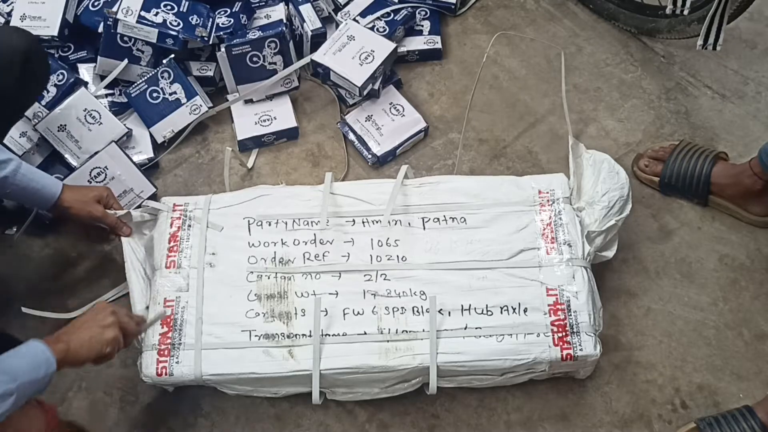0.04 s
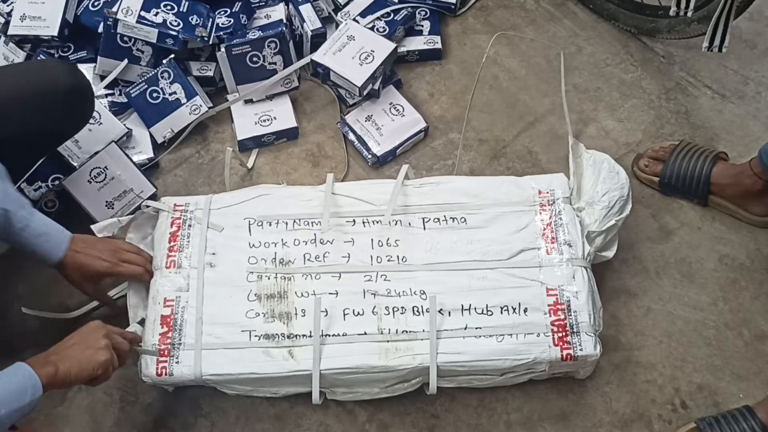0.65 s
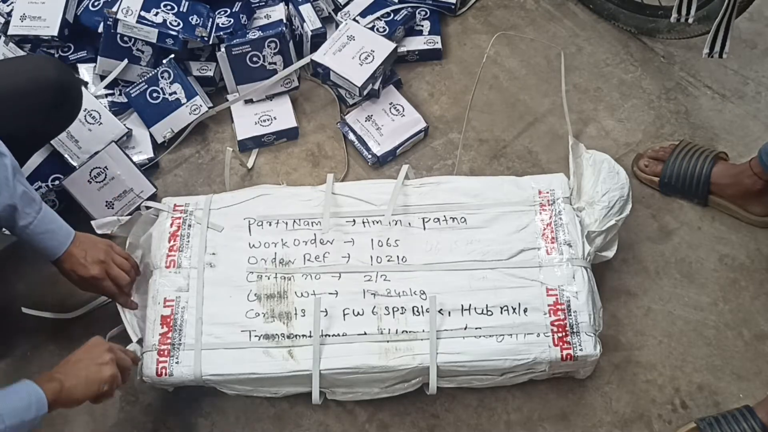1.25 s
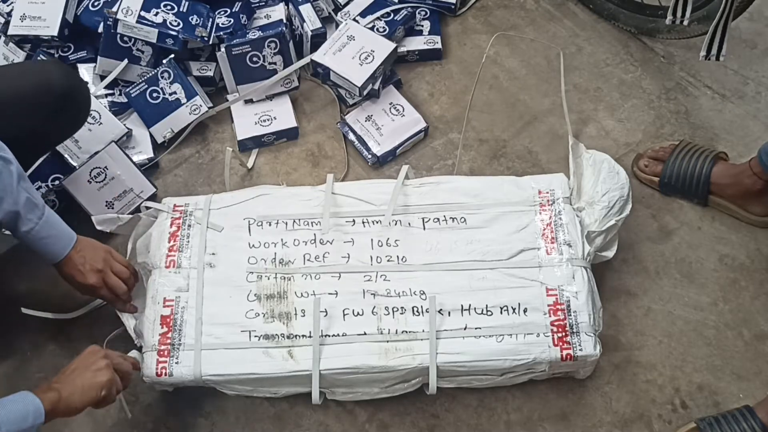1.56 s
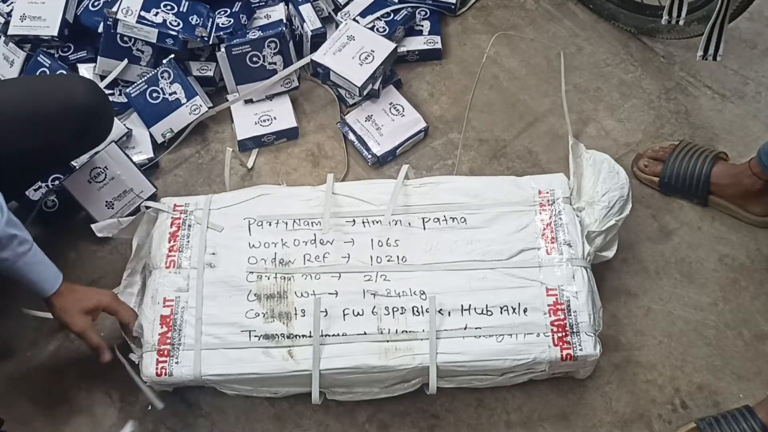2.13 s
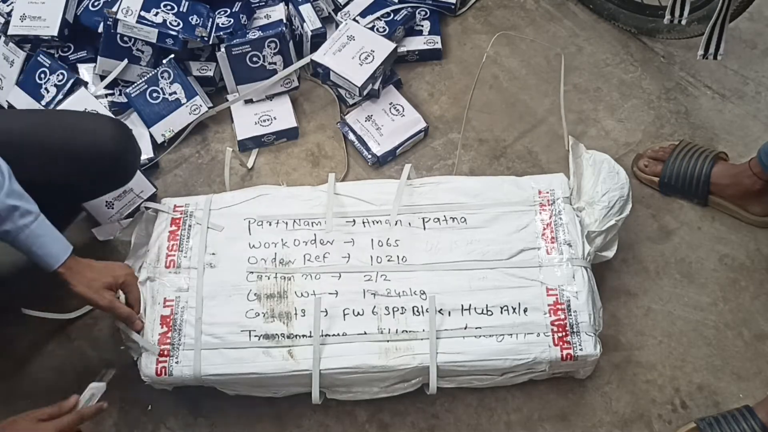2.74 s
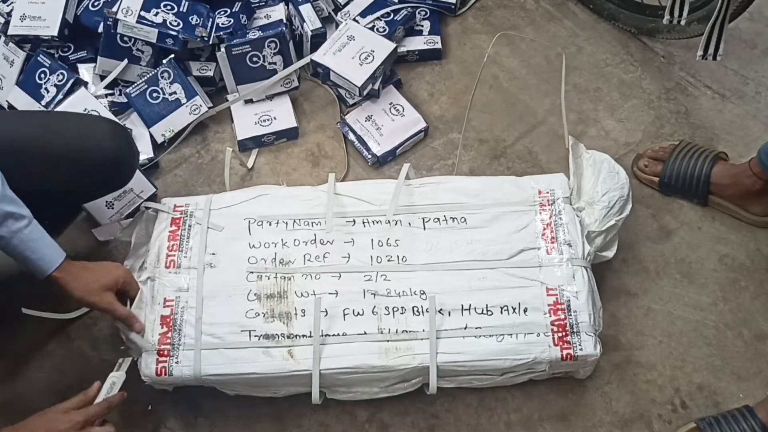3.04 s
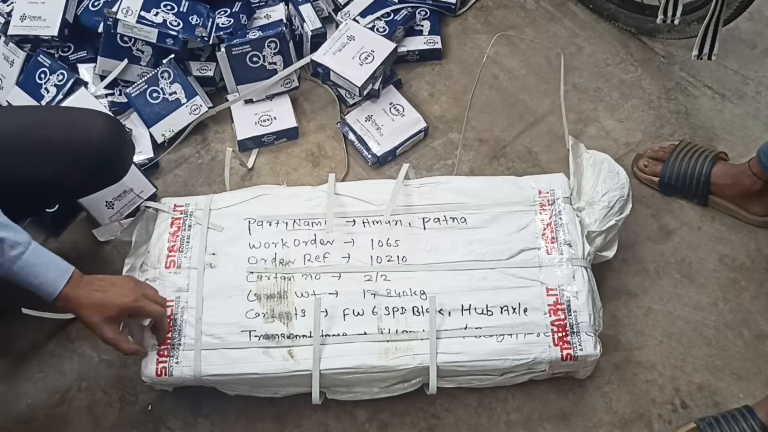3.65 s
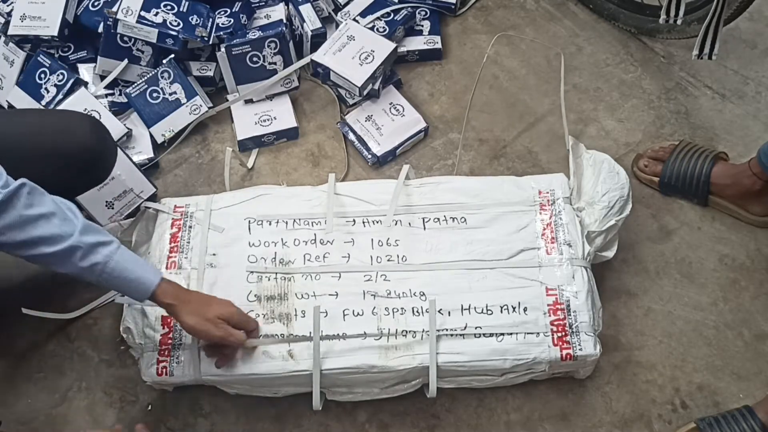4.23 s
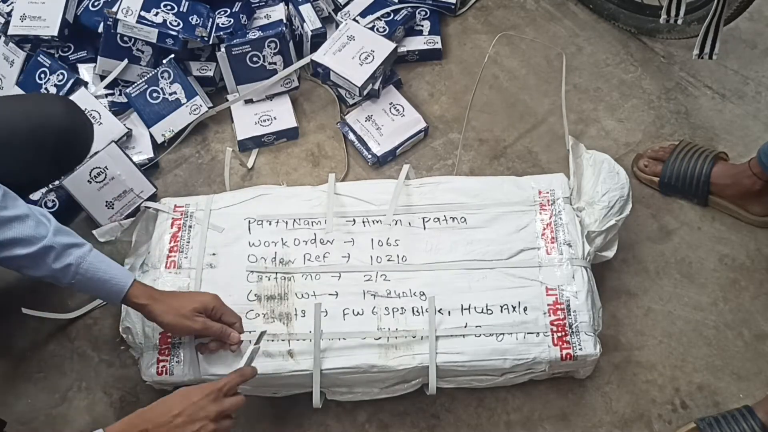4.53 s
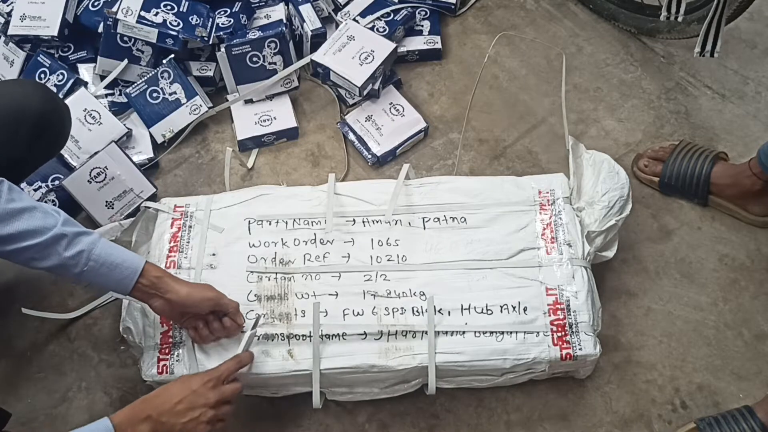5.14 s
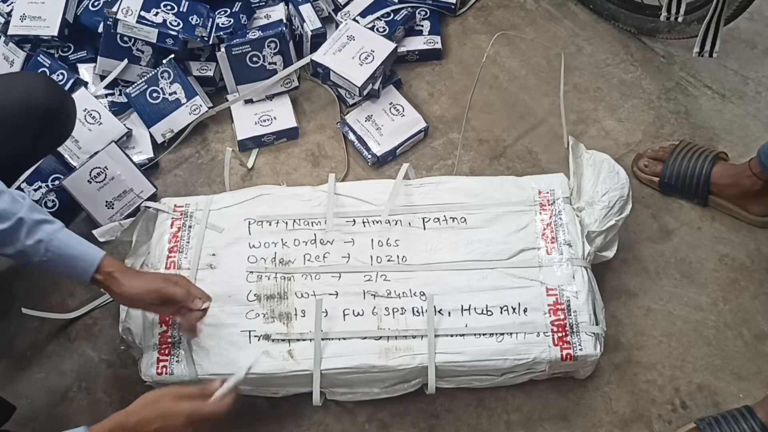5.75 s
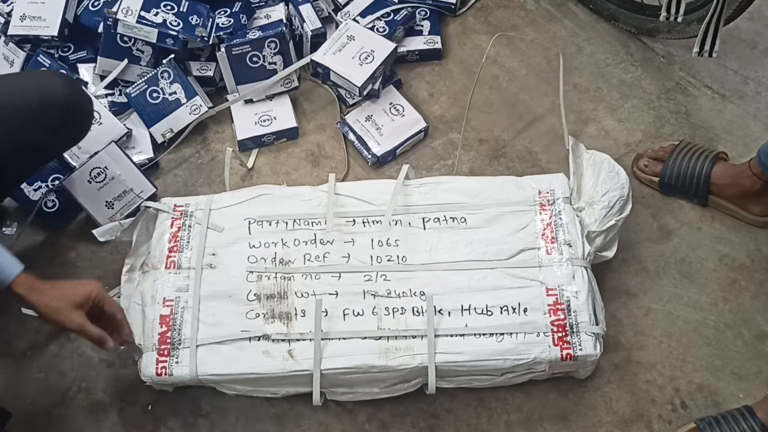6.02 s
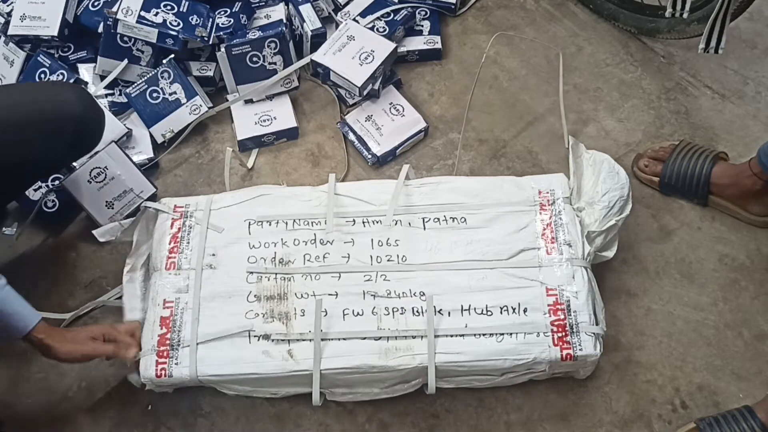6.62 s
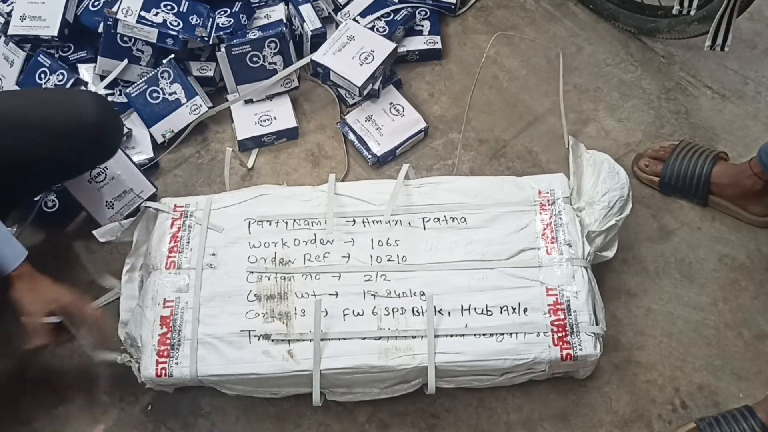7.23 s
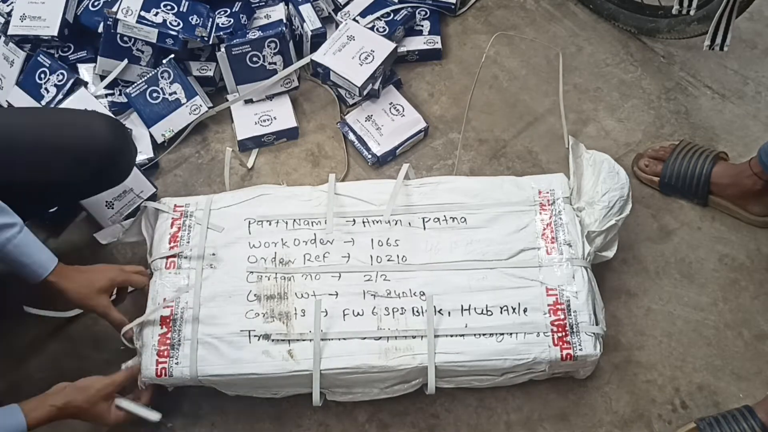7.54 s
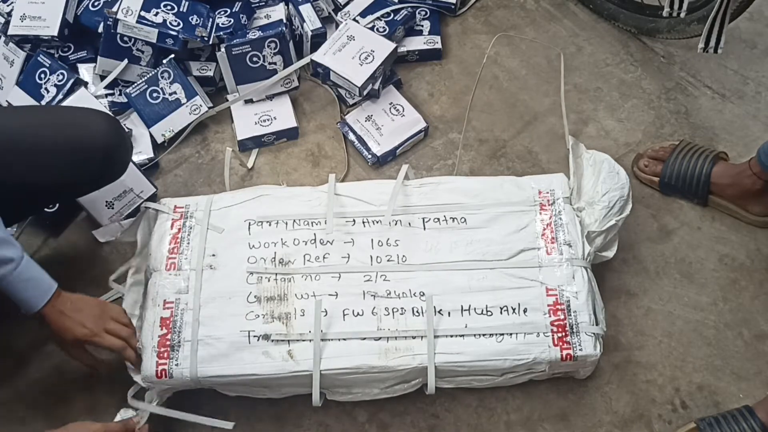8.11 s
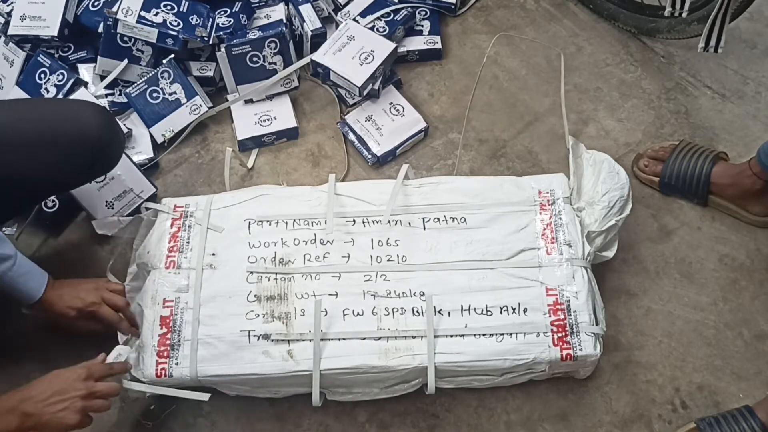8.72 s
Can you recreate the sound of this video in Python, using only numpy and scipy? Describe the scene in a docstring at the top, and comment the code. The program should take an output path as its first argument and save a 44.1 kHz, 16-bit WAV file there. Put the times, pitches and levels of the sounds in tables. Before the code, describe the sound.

Close up in a bare, quiet room, a woven plastic sack rustles and rasps unevenly while its packing straps are cut and pulled. Bright snaps bunch together in the first few seconds, then give way to light scraping and small blade ticks. One loud crack lands with a dull boom from the wrapped carton, and another thump comes a second later. The crinkling picks up again and several sharp cracks finish it.

```python
"""Cutting the straps off a carton

Plastic straps are cut and pulled off a carton sewn into a woven sack, on the floor of a bare room.
The weave crinkles under hands and straps, the knife ticks, and tight plastic cracks as it is cut.
The carton thumps when a strap lets go or a hand lands on it. One microphone listens close by."""
import sys
import numpy as np
from scipy import signal
from scipy.fft import rfft, irfft
from scipy.io import wavfile

SR = 44100
rng = np.random.default_rng(int(sys.argv[2]) if len(sys.argv) > 2 else 0)


def digitize_waveform(pressure):
    """Quantize a signal to 16-bit integers and store it at the path in sys.argv[1].

    Rows of a 2-D input are taken as channels; values are limited to [-1, 1].
    """
    field = np.atleast_2d(pressure).T
    bounded = np.clip(field, -1, 1)
    quanta = np.round(bounded * 32767).astype(np.int16)
    wavfile.write(sys.argv[1], SR, quanta)


N = 395566
TIME = np.arange(N) / SR

# Strokes of a hand or strap over the sack; rasp and carton levels are relative to the crinkle:
# (start [s], length [s], crinkle [dB], rasp [dB], carton shifting [dB], fade over the stroke [dB])
STROKES = [(-0.03, 0.32, -35.5, -7.5, -9, 14), (0.324, 0.12, -47.0, -1, -1, 2.5),
           (0.551, 0.094, -35.5, -11.5, -16, -4), (0.704, 0.2, -46.5, -5.5, -4.5, 3.5),
           (0.894, 0.1, -61, -5, 14, 8.5), (1.013, 0.21, -52.5, -5.0, -2.5, -3),
           (1.164, 0.32, -37.0, -9.0, -11.0, 3), (1.548, 0.23, -41.5, -7, -7.5, 8.5),
           (1.79, 0.17, -50.5, -5, -7, -1.0), (1.983, 0.23, -49.0, -2, -3.5, 8),
           (2.216, 0.22, -45.5, -1.5, -4, -3), (2.471, 0.29, -48.0, -6.5, -7, 2.5),
           (2.757, 0.14, -50, -5, -5, 0.5), (3.019, 0.11, -64.5, -7.5, -6, -4.5),
           (3.22, 0.086, -62.5, -3, -2.0, -3.5), (3.333, 0.15, -55.5, -3.5, 1, -7.5),
           (3.525, 0.14, -58, -7.0, -3.5, -2.5), (3.812, 0.19, -48.5, -19, -1, 1),
           (4.055, 0.13, -46, -12, -9.5, 1), (4.191, 0.094, -55, -6.5, -1, -5),
           (4.365, 0.046, -66.5, -2, -3, 0.0), (4.57, 0.19, -63, -8, -11, -12),
           (4.846, 0.2, -68.5, -7.5, -5.0, -6), (5.12, 0.14, -62, -4.5, 2, -1),
           (5.279, 0.33, -49.5, -7.5, -7.5, 1.5), (5.563, 0.21, -53.5, -5.5, 2, -2),
           (6.024, 0.09, -63.5, -2.5, -0.5, -5.0), (6.148, 0.13, -54.0, -2, -2.5, 2.5),
           (6.289, 0.13, -59, -3.5, -0.5, -1.5), (6.487, 0.13, -66.5, -2.5, -4.5, -14.5),
           (6.652, 0.096, -37, -19, -6.5, 1), (6.786, 0.092, -51, -8.0, -8.5, 3.5),
           (6.93, 0.2, -67, -12.5, -6, 8), (7.209, 0.15, -52.5, -6.5, -6.5, -17.5),
           (7.412, 0.36, -43.5, -4, -3, -0.5), (7.831, 0.14, -53.5, -4.5, 2, -6.5),
           (7.971, 0.18, -46.5, -3.5, -5, 0), (8.245, 0.16, -59.0, -3, -4.5, 12),
           (8.399, 0.22, -60, -2.5, -3.5, -3.5), (8.663, 0.049, -61, 4.5, 6, -1.5),
           (8.849, 0.1, -56, -2.5, -3.5, 6)]
# Cracks of strap and weave: (time [s], level [dB], pitch [Hz], splinters relative to the crack [dB])
CRACKS = [(.1459, -13.5, 6840, -23), (.2122, -19.5, 6700, -7), (0.3622, -24, 4560, -17),
          (1.036, -31, 7300, -13), (1.1657, -12.5, 7050, -10), (1.194, -6, 5260, -11),
          (1.2214, -6, 5560, -14), (1.2426, -8.5, 4570, -12.5), (1.4312, -6.5, 9500, -16),
          (1.6144, -5, 4700, -20), (1.631, -5.5, 7760, -18.5), (1.885, -20, 5370, -10.5),
          (2.021, -28, 7440, -12), (2.3389, -18, 3500, -6.5), (2.358, -12, 7050, -17),
          (2.387, -8.5, 4700, -15), (2.5087, -18.5, 3520, -17), (3.819, -35, 7590, -23),
          (4.645, -13.5, 5100, -24), (4.653, -21, 14500, -18), (4.674, -27, 7000, -6.5),
          (4.8592, -46.5, 2900, -11), (5.086, -35, 5240, -19), (5.1185, -23.5, 8600, -10.5),
          (5.2661, -26.5, 7700, -14.5), (5.4628, -6.5, 5700, -9.5), (5.64, -29, 8700, -7),
          (5.79, -37.5, 5200, 1), (5.8261, -17, 4250, -15), (6.613, -19, 7140, -14),
          (6.649, -20.5, 4730, -9), (7.3068, -20.5, 7600, -17), (7.7065, -23, 7300, -6.5),
          (7.732, -22, 7100, -13), (7.879, -26.5, 7340, -19), (8.161, -23.5, 4000, -23),
          (8.6834, -30, 2540, -28), (8.9328, -12, 5020, -10.5), (8.948, -8.5, 5100, -14),
          (8.9654, -8, 5040, -10)]
# The bright tone of crinkles and knife ticks: (frequency [Hz], level [dB])
CRINKLE_TONE = [(400, -28), (1200, -12.5), (2400, -11), (3600, -5), (5200, 0), (6300, -3), (7600, 1),
                (8600, -3), (9600, -12), (11500, -12), (13000, -8), (14500, -2), (15500, -5.5)]


def from_db(db):
    """Turn decibels into a factor to multiply by."""
    return 10 ** (np.asarray(db) / 20)


def unit_power(x):
    """Scale a sound to an average power of 1."""
    return x / np.sqrt(np.mean(x ** 2) + 1e-20)


def at_hz(points, hz):
    """Read between the rows of a table, with all octaves equally wide."""
    row_hz, value = np.transpose(points)
    return np.interp(np.log(np.maximum(hz, 1)), np.log(row_hz), value)


def add(track, time_s, sound):
    """Mix a sound into the track at the given time."""
    start = int(np.clip(time_s * SR, 0, N - 1))
    track[start:start + len(sound)] += sound[:N - start]


def drift(per_s):
    """A curve that wanders at random, typically about 1 away from zero."""
    points = rng.standard_normal(N // 20)
    return np.interp(TIME * per_s, np.arange(len(points)), points) * np.sqrt(3 / 2)


def coloured(x, tone, size=4096):
    """Give a sound the tone in a table, using a filter that rings only after a click (minimum phase)."""
    gains = from_db(at_hz(tone, np.fft.rfftfreq(size, 1 / SR)))
    cepstrum = irfft(np.log(gains))
    cepstrum[1:size // 2] *= 2
    cepstrum[size // 2 + 1:] = 0
    click_response = irfft(np.exp(rfft(cepstrum)))
    return signal.fftconvolve(x, click_response)[:len(x)]


def resonance(x, hz, width_hz):
    """Keep a band around one pitch, so that clicks ring there."""
    r = np.exp(-np.pi * width_hz / SR)
    feedback = [1, -2 * r * np.cos(2 * np.pi * hz / SR), r * r]
    return signal.lfilter(np.array([1, 0, -1]) * (1 - r * r) / 2, feedback, x)


def grains(per_s, spread_db, size):
    """Random clicks of very uneven strength."""
    happens = rng.random(size) < per_s / SR
    strength = from_db(spread_db * np.minimum(rng.exponential(1, size), 4))
    return unit_power(happens * strength * rng.choice([-1, 1], size))


def reflections(size=16000):
    """The room's answer to a click: dense echoes whose treble dies first."""
    # How long the room rings: (frequency [Hz], time to fade by 60 dB [s])
    room_decay = [(100, 0.27), (500, 0.28), (2000, 0.26), (6000, 0.22), (10000, 0.21), (15000, 0.17)]
    t, hz = TIME[:size], np.fft.rfftfreq(size, 1 / SR)
    noise_spectrum = rfft(rng.standard_normal(size))
    bands, ring_times = np.transpose(room_decay)
    tail = np.zeros(size)
    for share, ring_s in zip(np.eye(len(bands)), ring_times):
        band = irfft(noise_spectrum * at_hz(np.c_[bands, share], hz), size)
        tail += band * from_db(-60 * t / ring_s)
    tail *= np.clip(t / .005, 0, 1)   # the echoes build up over 5 ms
    return tail / np.linalg.norm(tail)


def in_room(x, echo_db, spots=1):
    """Add the room: a sound's clicks are shared among a few spots, each with its own echoes."""
    spot = rng.integers(0, spots, len(x))
    echoes = sum(signal.oaconvolve(x * (spot == k), reflections())[:len(x)] for k in range(spots))
    return (x + from_db(echo_db) * echoes) / np.hypot(1, from_db(echo_db))


def stroke_level(levels_db, release_db_per_s, rest_db, attack_s=0.039):
    """Level in dB over time: each stroke takes hold, fades or grows, then dies away; overlaps add up."""
    t = TIME[::64]
    power = from_db(rest_db) ** 2   # under resting hands
    for (start, length, *_, fade_db), level_db in zip(STROKES, levels_db):
        age = t - start
        attack = np.clip(age / attack_s, 0, 1)
        sag_db = fade_db * (np.clip(age / length, 0, 1) - .5)
        release_db = release_db_per_s * np.maximum(age - length, 0)
        power = power + (attack * from_db(level_db - sag_db - release_db)) ** 2
    return np.interp(TIME, t, 10 * np.log10(power))


def room_air(level_db=-69.5):
    """The quiet air of the room: a steady low rumble with a faint hiss."""
    # The tone of the air: (frequency [Hz], level [dB])
    air_tone = [(20, -16.5), (60, 6), (110, 9.5), (350, -5.5), (800, -10.5), (2000, -15.5), (7000, -14),
                (11000, -24), (15500, -14)]
    return from_db(level_db) * unit_power(coloured(rng.standard_normal(N), air_tone))


def carton_shifting(gain_db=1.0):
    """Every stroke gives the carton small nudges that make it mutter."""
    # The dull tone of the nudged carton: (frequency [Hz], level [dB])
    shift_tone = [(25, -38), (60, -22), (115, 3.5), (160, -6.5), (220, -1.5), (380, -5), (520, -8.5),
                  (750, -16), (2000, -45)]
    _, _, stroke_db, _, shift_db, _ = np.transpose(STROKES)
    level_db = stroke_level(stroke_db + shift_db, release_db_per_s=127, rest_db=-75.5)
    nudges = in_room(grains(per_s=500, spread_db=2.5, size=N), echo_db=4, spots=2)
    return unit_power(coloured(nudges, shift_tone)) * from_db(level_db + gain_db)


def sack_weave(crinkle_gain_db=3.0, rasp_gain_db=2.0, clump_db=1.5, release_db_per_s=173.5):
    """Tapes of the weave slip over each other in clumps; harder rubbing gives more slips a second."""
    # The lower, rougher tone of the rubbed weave: (frequency [Hz], level [dB])
    rasp_tone = [(200, -7), (600, 1.5), (1400, -1.5), (2500, -3.5), (4500, 0.5), (9000, -19)]
    _, _, stroke_db, rasp_offset_db, _, _ = np.transpose(STROKES)
    crinkle_db = stroke_level(stroke_db, release_db_per_s, rest_db=-86)
    rasp_db = stroke_level(stroke_db + rasp_offset_db, release_db_per_s, rest_db=-85.5)
    slips_per_s = 2000 * from_db(.35 * (np.clip(crinkle_db, -65, -30) + 45))
    slips = grains(slips_per_s, spread_db=4.0, size=N) / np.sqrt(slips_per_s)   # denser, not louder
    slips *= from_db(clump_db * drift(per_s=70))
    slips = in_room(slips, echo_db=3, spots=4)
    crinkle = unit_power(coloured(slips, CRINKLE_TONE)) * from_db(crinkle_db + crinkle_gain_db)
    rasp = unit_power(coloured(slips, rasp_tone)) * from_db(rasp_db + rasp_gain_db)
    return crinkle + rasp


def knife_ticks(tick_gain_db=9, tick_s=0.0004, size=12000):
    """The thin steel blade ticks; pressed on a strap it is muffled, held free it pings."""
    # The notes the blade rings at: (pitch [Hz], level [dB], time to fade by 60 dB [s])
    blade_notes = [(6850, -4, .025), (7180, 3, 0.028), (7300, 1, .04), (7900, -14, .025)]
    # Touches of the blade: (time [s], level [dB], ring relative to that level [dB])
    touches = [(4.976, -43, -28), (5.1098, -30, -32), (5.389, -31.5, -26), (5.631, -30, -32),
               (8.863, -33.5, -5.5)]
    out, t = np.zeros(N), TIME[:size]
    ring = sum(from_db(db - 60 * t / ring_s) * np.sin(2 * np.pi * hz * t)
               for hz, db, ring_s in blade_notes)
    for time_s, level_db, ring_db in touches:
        burst = rng.standard_normal(size) * np.exp(-t / tick_s)
        tick = coloured(burst, CRINKLE_TONE) * from_db(tick_gain_db)
        add(out, time_s, in_room(ring * from_db(ring_db) + tick, echo_db=-4) * from_db(level_db))
    return out


def carton_blows(rebound_s=.046, tug_above_db=-11.5, tug_hz=260):
    """List the blows: each thump, a softer rebound as the carton settles, and tugs from loud cracks."""
    # Thumps on the carton; the list returned has the first five of these columns:
    # (time [s], panels [dB], favoured pitch [Hz], boom [dB], slap [dB], rebound relative to thump [dB])
    thump_table = [(2.154, -34.5, 196, -50, -64, -14), (2.507, -42, 283, -66, -38.5, -11),
                   (3.358, -35.5, 262, -36, -53, -9), (3.834, -34, 198, -42.5, -48.5, -9),
                   (4.643, -38, 346, -48.5, -39.5, -2), (5.461, -16, 240, -25, -20.5, -15),
                   (5.823, -37.5, 354, -49.5, -49.5, -19), (6.612, -19, 275, -31, -43.5, -16),
                   (7.304, -36.5, 301, -60, -51, -16), (7.345, -25.5, 235, -61, -46, -25),
                   (7.81, -28, 248, -51, -70, -11), (8.949, -30, 202, -49, -40, -14)]
    thumps = [(time_s + late_s, panel_db + db, hz, boom_db + db, slap_db + db)
              for time_s, panel_db, hz, boom_db, slap_db, rebound_db in thump_table
              for late_s, db in [(0, 0), (rebound_s, rebound_db)]]
    tugs = [(time_s, db - 33, tug_hz, db - 43, db - 28.5)
            for time_s, db, *_ in CRACKS if db > tug_above_db]
    return thumps + tugs


def carton_thumps(panel_gain_db=-8.0, boom_gain_db=0.5, slap_gain_db=-3.5,
                  slap_s=0.01, boom_rise_s=0.036, lag_s=.001, size=20000):
    """A blow slaps the cover, rings the carton's panels and sets the whole box booming."""
    # Notes of the whole box, then of its panels: (pitch [Hz], level [dB], time to fade by 60 dB [s])
    carton_notes = [(55.7, -22, 0.71), (88, -10, 0.22), (117.4, 2.5, 0.24), (134.6, -4.5, 0.18),
                    (193.5, -5.5, 0.3), (220.8, 2.5, 0.11), (248, 1, 0.15), (289.7, -6, 0.35),
                    (322.2, -3, 0.28), (372.2, -1.5, 0.2), (407, -1, 0.096), (445.4, 2, 0.11),
                    (502, -7, 0.16), (590, -16, 0.36)]
    # The tone of a slap on the cover: (frequency [Hz], level [dB])
    slap_tone = [(30, -33), (60, -21), (150, -0.5), (450, 10.5), (700, 1.5), (1100, -1.5), (1600, -4.5),
                 (2600, -22), (6000, -13.5)]
    out, t = np.zeros(N), TIME[:size]
    note_hz, note_db, ring_s = np.transpose(carton_notes)[:, :, None]
    whole_box = note_hz[:, 0] < 160
    cushion = np.clip(t / 0.0039, 0, 1)   # the sack softens the contact
    for time_s, panel_db, favoured_hz, boom_db, slap_db in carton_blows():
        # where the blow lands decides which panels answer most
        octaves_away = np.abs(np.log2(note_hz / favoured_hz))
        strength_db = note_db - 6 * octaves_away + rng.normal(0, 1.2, note_db.shape)
        hz = note_hz * (1 + rng.normal(0, 0.023, note_hz.shape))   # hands and straps load the walls
        # all notes are pushed the same way, so they start as one knock
        notes = from_db(strength_db - 60 * t / ring_s) * np.sin(2 * np.pi * hz * t)
        boom = sum(notes[whole_box]) * (1 - np.exp(-t / boom_rise_s))
        panels = in_room(sum(notes[~whole_box]) * cushion, echo_db=-8)
        burst = rng.standard_normal(size) * np.exp(-t / slap_s)
        slap = coloured(in_room(burst, echo_db=4, spots=2), slap_tone)
        for sound, db in [(boom, boom_db + boom_gain_db), (panels, panel_db + panel_gain_db),
                          (slap, slap_db + slap_gain_db)]:
            gain = from_db(db) / np.std(sound[:SR // 20])   # sets the level of the first 50 ms
            add(out, time_s + lag_s, sound * gain)   # the heavy box answers a moment later
    return out


def plastic_cracks(gain_db=5.0, click_db=7, tear_s=0.00041, splinter_s=0.012, size=16000):
    """Tight plastic gives way with a sharp click, tears and rings briefly; fibres splinter after it."""
    # The tone of breaking plastic: (frequency [Hz], level [dB])
    plastic_tone = [(30, -40.5), (100, -4), (400, -1.5), (1200, -6), (2400, -3), (4000, 0), (5300, -1),
                    (7600, 1.5), (9600, -5), (11500, -8), (13200, -0.5), (15000, 3)]
    out, t = np.zeros(N), TIME[:size]
    for time_s, level_db, hz, splinter_db in CRACKS:
        snap = rng.choice([-1, 1], size) * np.exp(-t / tear_s)
        snap[0] = from_db(click_db)
        splinters = grains(per_s=2500, spread_db=2.5, size=size)
        splinters *= from_db(splinter_db) * np.exp(-t / splinter_s)
        burst = in_room(snap + splinters, echo_db=2.5, spots=2)
        ring = resonance(burst, hz, width_hz=1800)
        crack = coloured((burst + ring) / 2, plastic_tone)
        add(out, time_s, crack * from_db(level_db + gain_db))
    return out


def scene():
    """All the handling over the quiet air of the room, the same in both channels."""
    handling = sack_weave() + carton_shifting() + plastic_cracks() + carton_thumps() + knife_ticks()
    mono = handling + room_air()
    return np.array([mono, mono])


def record(dry, bass_cut_hz=35, treble_cut_hz=15550):
    """The small microphone loses the deepest bass; the highest treble is cut steeply."""
    bass_cut = signal.butter(3, bass_cut_hz, "high", fs=SR, output="sos")
    treble_cut = signal.ellip(12, .1, 80, treble_cut_hz, fs=SR, output="sos")
    return signal.sosfilt(treble_cut, signal.sosfilt(bass_cut, dry))


dry = scene()
out = record(dry)
digitize_waveform(out)
```